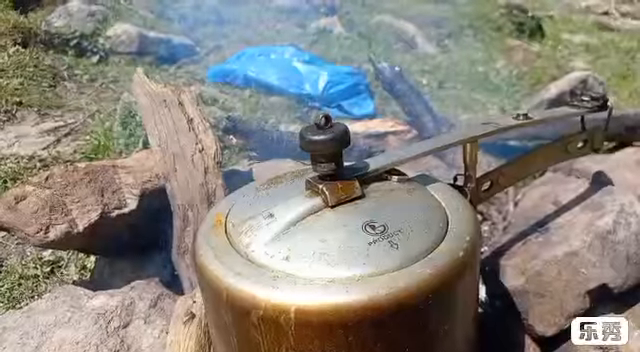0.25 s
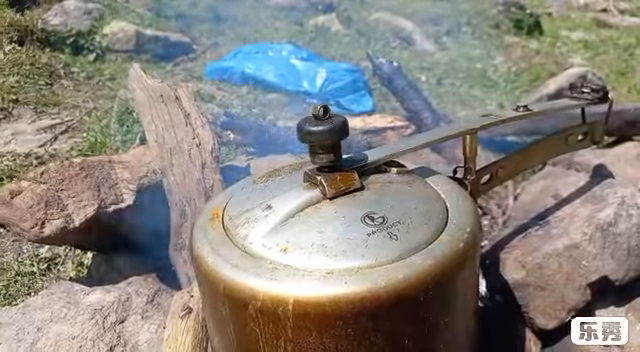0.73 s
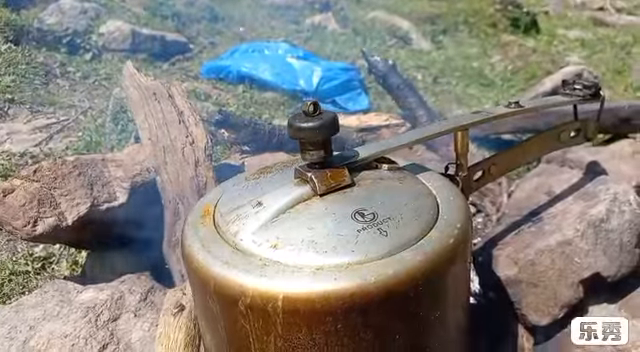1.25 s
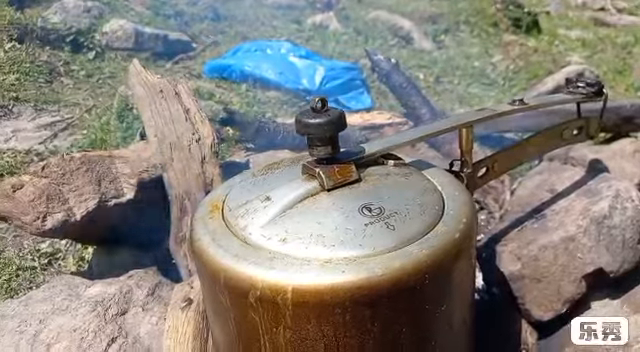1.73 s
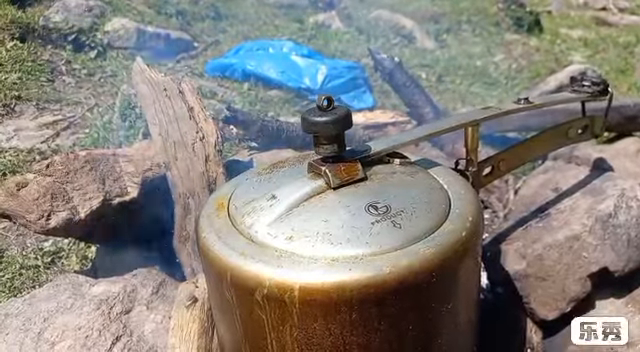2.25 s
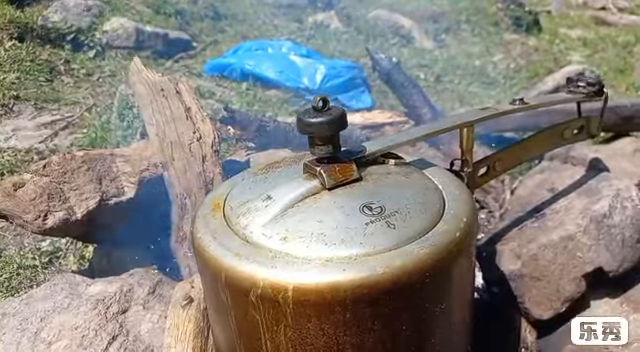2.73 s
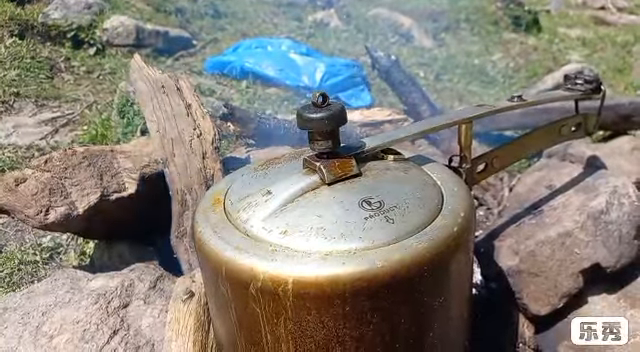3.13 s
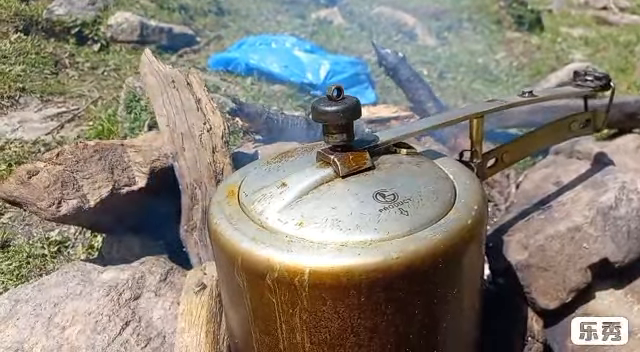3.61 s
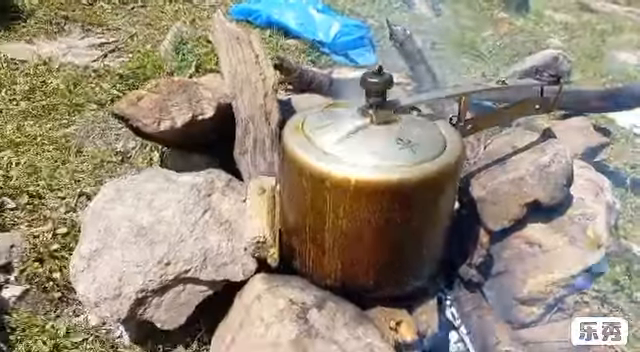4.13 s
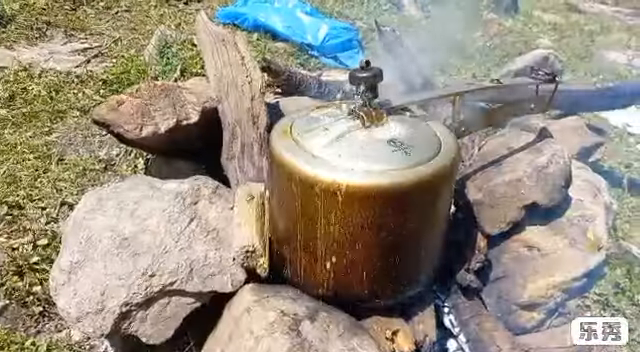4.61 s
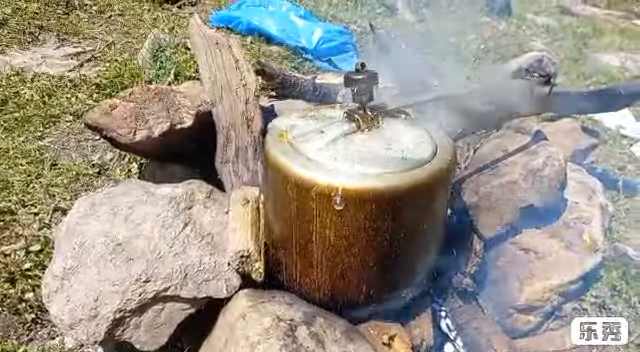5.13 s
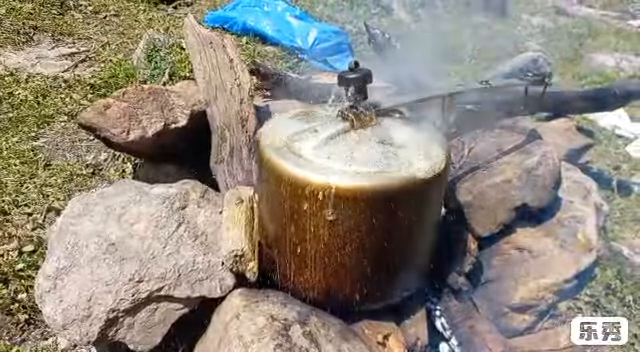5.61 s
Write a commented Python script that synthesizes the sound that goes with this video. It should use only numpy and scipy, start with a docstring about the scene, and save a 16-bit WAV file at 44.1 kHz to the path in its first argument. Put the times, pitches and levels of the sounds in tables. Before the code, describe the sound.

Outdoors, close to a pressure cooker on a wood fire, a thin, slightly grainy steam hiss leaks steadily. Low wind buffets the microphone, mostly on the left, growing heavier past the middle, and a wood snap or two crackles softly. At about four and a half seconds the valve lifts at once and a far louder, broad, fluttering jet of steam roars until the end.

```python
"""Steam hisses thinly, then a full jet roars out, fluttering; wind thumps, mostly on the left, and wood crackles.
A pressure cooker stands on a wood fire outdoors: steam leaks past its valve weight until the weight lifts.
Hiss and jet are patchy noise with narrow peaks, coloured by the lid and the hearth stones.
Wind is lumpy low noise plus short swings on a microphone port; each crackle is a fading burst of noise."""
import sys
import numpy as np
from scipy import signal
from scipy.fft import rfft, irfft, next_fast_len
from scipy.io import wavfile
from scipy.ndimage import uniform_filter1d, map_coordinates

SR = 44100
rng = np.random.default_rng(int(sys.argv[2]) if len(sys.argv) > 2 else 0)


def int16_out(signal):
    """Quantize to a 16-bit WAV file."""
    q = np.round(np.clip(np.atleast_2d(signal).T, -1, 1) * 32767)
    wavfile.write(sys.argv[1], SR, q.astype(np.int16))


N = 258405

# Colour of the finer swirls of wind: (frequency [Hz], relative level per Hz [dB])
SWIRL_COLOUR = [(60, -35), (130, -8), (220, 3), (320, -11.5), (480, -21.5), (700, -40.5), (1400, -96)]


def amp(db):
    """Decibels to gain."""
    return 10 ** (np.asarray(db) / 20)


def unit(x):
    """Scale to rms 1."""
    return x / np.sqrt(np.mean(x ** 2) + 1e-20)


def along(points, hz):
    """Read (frequency [Hz], value) points on a log frequency axis."""
    f, v = np.transpose(points)
    return np.interp(np.log(hz + 1), np.log(f + 1), v)


def curves(rows):
    """One value per sample for each column after the time."""
    s, *cols = np.transpose(rows)
    return [np.interp(np.arange(N) / SR, s, c) for c in cols]


def wobble(rate):
    """A smooth random curve with the given number of random points a second."""
    points = rng.standard_normal(int(N * rate / SR) + 4)
    return map_coordinates(points, [np.arange(N) * rate / SR])


def filtered(x, response):
    """Multiply the spectrum of x by a response that depends on frequency."""
    m = next_fast_len(N + SR // 4)  # spare room at the end
    hz = np.fft.rfftfreq(m, 1 / SR)
    return irfft(rfft(x, m) * response(hz), m)[..., :N]


def lowpass(x, cut_hz, steepness):
    """Keep what lies below cut_hz; a higher steepness cuts off more sharply."""
    return filtered(x, lambda hz: 1 / (1 + (hz / cut_hz) ** steepness))


def noise(spectrum):
    """Coloured noise of rms 1."""
    return unit(filtered(rng.standard_normal(N), lambda hz: amp(along(spectrum, hz))))


def reshaped(x, gain_db, size):
    """Give x a colour that changes in time: gain_db(frequency [Hz], time [s])."""
    hz, s, z = signal.stft(x, SR, nperseg=size)
    return signal.istft(z * amp(gain_db(hz[:, None], s)), SR, nperseg=size)[1][:, :N]


def patches(shape, size_hz, size_s):
    """A random map over frequency and time, blurred into patches of the given sizes in cells."""
    rough = rng.standard_normal(shape)
    return unit(uniform_filter1d(uniform_filter1d(rough, size=size_hz, axis=0), size=size_s, axis=1))


def fire(t60=0.079, tick_db=7, tick_t60=0.0072):
    """Burning wood snaps under the pot: a sharp tick, then a short hollow tail; t60 is the time to fall 60 dB."""
    # When the wood crackles: (time [s], starting level of the tail [dB])
    crackles = [(0.4388, -47.5), (2.246, -52), (4.347, -54)]
    # Colour of a crackle's tail: (frequency [Hz], relative level per Hz [dB])
    ember = [(200, -54), (700, 7.5), (1500, 10), (4000, -11), (15000, -24)]
    t = np.arange(N) / SR

    def snaps(decay):
        return sum((t >= s) * amp(db - 60 * abs(t - s) / decay) for s, db in crackles)
    tails = snaps(t60) * noise(ember)
    ticks = snaps(tick_t60) * amp(tick_db) * rng.standard_normal(N)
    return tails + ticks


def gust_force(rise_db_per_s=750, fall_db_per_s=424, calm_db=-77):
    """Wind force in dB at each port: every gust rises fast, holds and falls back to the calm."""
    # Gusts of wind: (start of hold [s], hold [s], force on the left port [dB], force on the right port [dB])
    gusts = [(0, 0.029, -30, -99), (0.05, 0.042, -49.5, -80), (0.24, 0.059, -36.5, -52),
             (0.335, 0.02, -40, -72), (0.47, 0.059, -58, -80), (0.571, 0.015, -61, -80),
             (0.633, 0.02, -62, -80), (0.703, 0.04, -51.5, -50), (0.81, 0.03, -38, -40),
             (0.856, .13, -32, -81), (1.01, 0.098, -45.5, -78), (1.122, 0.13, -33, -84),
             (1.32, 0.05, -54, -80), (1.416, 0.027, -47, -78), (1.625, 0.097, -31.5, -78),
             (1.746, .18, -37.5, -78), (1.96, 0.14, -53, -78), (2.091, 0.11, -30, -74),
             (2.248, 0.19, -33, -57), (2.43, 0.095, -40, -68), (2.522, 0.21, -29.5, -38.5),
             (2.76, 0.17, -32, -41.5), (2.946, 0.075, -26, -62), (3.044, 0.4, -32.5, -43),
             (3.41, 0.05, -39, -45), (3.49, 0.13, -41.5, -48), (3.648, 0.27, -25.5, -64),
             (3.9, 0.079, -34.5, -43), (4.045, 0.021, -25.5, -38), (4.128, 0.25, -38.5, -71),
             (4.23, 0.018, -31, -76), (4.448, 0.018, -37, -35.5), (4.67, 0.022, -65, -39),
             (4.892, 0.023, -42, -37), (4.99, 0.013, -36, -32.5), (5.07, 0.1, -50, -46)]
    t, force_db = np.arange(N) / SR, np.full((2, N), float(calm_db))
    for start, hold, left_db, right_db in gusts:
        rise_db = rise_db_per_s * (t - start)
        fall_db = fall_db_per_s * (start + hold - t)
        shape_db = np.minimum(0, np.minimum(rise_db, fall_db))
        force_db = np.maximum(force_db, shape_db + np.array([[left_db], [right_db]]))
    return force_db


def port_wind(force_db, lumpy_db=3.5, swirl_lumpy_db=3.0, flurry_db=-13, steepness=1.43, strong_db=-22,
              span_s=0.074):
    """Lumpy rumble on one port follows the gusts; finer swirls grow faster than the rumble."""
    # Colour of the low rumble of wind: (frequency [Hz], relative level per Hz [dB])
    rumble_colour = [(25, -37), (40, -19), (60, -1), (85, 5.5), (115, 2), (160, -8), (200, -12), (240, -22),
                     (330, -40), (500, -53), (1000, -101)]
    lumps = amp(lumpy_db * wobble(45))
    churn = lumps * noise(rumble_colour)
    # Even out the loudness over each short span, then let the gusts set it
    loudness = np.sqrt(abs(uniform_filter1d(churn ** 2, size=int(span_s * SR))))
    rumble = churn / loudness * amp(force_db)
    fine = unit(lumps * amp(swirl_lumpy_db * wobble(60)) * noise(SWIRL_COLOUR))
    swirl_level_db = strong_db + flurry_db + steepness * (force_db - strong_db)
    return rumble + fine * amp(swirl_level_db)


def eddies(snap_hz=232, snap_share=0.33, swirl_db=-6):
    """Each eddy pushes the diaphragm in a brief swing; its tight core adds a shorter snap and a few fine swirls."""
    # Strong eddies on the left port: (time [s], relative thump level [dB], thump frequency [Hz],
    # relative core level [dB], half length [s])
    eddy_rows = [(0.034, -29, 105, -59, 0.0054), (0.245, -29, 90, -53, 0.0074),
                 (0.288, -26, 86, -56, 0.0069), (0.872, -29, 103, -46, 0.01), (0.94, -30, 97, -48, 0.0099),
                 (1.147, -43, 120, -39, 0.01), (1.23, -27, 91, -52, 0.0075), (1.257, -25, 111, -44, 0.0034),
                 (1.662, -27, 94, -46, 0.007), (1.897, -46, 121, -42, 0.0067),
                 (2.191, -25, 122, -35, 0.0041), (2.426, -23.5, 116, -38, 0.0073),
                 (2.545, -30, 118, -33, 0.0095), (2.694, -25.5, 109, -37, 0.016),
                 (2.76, -15, 123, -16, 0.0039), (2.778, -14, 110, -24, 0.0087),
                 (2.789, -29, 114, -16.5, 0.014), (2.802, -15, 103, -22, 0.0085),
                 (2.841, -19, 108, -32, 0.0096), (2.891, -38, 130.4, -24, 0.0045),
                 (2.931, -20.5, 96, -41, 0.0074), (2.994, -19.5, 82.4, -28.5, 0.015),
                 (3.039, -23.5, 124, -20, 0.0076), (3.065, -25, 95, -40, 0.0083),
                 (3.145, -23.5, 131, -23, 0.0082), (3.176, -22.5, 89, -25.5, 0.013),
                 (3.199, -21.5, 86.6, -35, 0.013), (3.261, -38, 100, -52, 0.0075),
                 (3.284, -31, 120, -26, 0.009), (3.32, -25.5, 126, -30, 0.014),
                 (3.371, -24.5, 132, -31.5, 0.0054), (3.669, -27, 113, -16.5, 0.0091),
                 (3.687, -30, 121, -26, 0.0025), (3.717, -23, 101, -47, 0.0056),
                 (3.754, -18, 103, -10.5, 0.0031), (3.819, -20, 115, -26, 0.0024),
                 (3.854, -24, 120, -25, 0.0037), (3.869, -37, 105, -21.5, 0.0086),
                 (3.904, -23, 120, -30, 0.011), (3.945, -25.5, 112, -34, 0.0082),
                 (4.057, -21, 115, -25.5, 0.011), (4.156, -23.5, 95.5, -59, 0.0062),
                 (4.302, -17, 95, -39, 0.0049), (4.999, -24.5, 84, -40, 0.0047)]
    t, out = np.arange(N) / SR, np.zeros(N)
    swirl = noise(SWIRL_COLOUR)
    phases = rng.uniform(0, 2 * np.pi, len(eddy_rows))
    for (s, thump_db, thump_hz, core_db, half), phase in zip(eddy_rows, phases):
        near = abs(t - s) < 4 * half
        u = t[near] - s  # seconds from the middle of the eddy

        def swing(hz, width):
            return np.sqrt(2) * np.exp(-(u / width) ** 2 / 2) * np.cos(2 * np.pi * hz * u + phase)
        fine = amp(swirl_db) * np.exp(-(u / half) ** 2) * unit(swirl[near])
        core = swing(snap_hz, snap_share * half) + fine
        out[near] += amp(thump_db) * swing(thump_hz, half) + amp(core_db) * core
    return out


def wind(eddy_db=-1.0, skew=0.32):
    """Gusts and eddies strike the left port, the right is mostly sheltered; hard blows suck more than they push."""
    left_db, right_db = gust_force()
    left = port_wind(left_db) + amp(eddy_db) * eddies()
    push = np.array([left, port_wind(right_db)])
    return push - skew * push ** 2


def turbulence(patchy_db, size=512):
    """Turbulent steam: two white noises that share short-lived patches of random gain."""
    z = signal.stft(rng.standard_normal((2, N)), nperseg=size)[2]
    field = patches(z.shape[1:], size_hz=9, size_s=10)
    return signal.istft(z * amp(patchy_db * field), nperseg=size)[1][:, :N]


def at_ports(pair, colour, balance, alike, lead, low_cut_hz, peaks, peak_width_hz):
    """Steam at the two ports: coloured, with narrow peaks, partly alike, mostly earlier on the left."""
    ear = np.array([[1], [-1]])  # left, right

    def blend(hz):
        turn = np.arccos(np.clip(along(alike, hz), 0, 1)) / 2
        return np.array([np.cos(turn), np.sin(turn)])
    mid, side = filtered(pair, blend)

    def path(hz):
        peaks_db = sum(db / (1 + ((hz - centre) / peak_width_hz) ** 4) for centre, db in peaks)
        angle = np.interp(hz, *np.transpose(lead))
        no_bass = np.sqrt(1 - 1 / (1 + (hz / low_cut_hz) ** 6))
        level_db = along(colour, hz) + peaks_db + ear * along(balance, hz) / 2
        return no_bass * amp(level_db) * np.exp(1j * ear * angle / 2)
    return unit(filtered(mid + ear * side, path))


def reflections(steam, ripple, slide_per_s, middle_s):
    """Peaks and notches from lid and stones; they slide in pitch as the hand-held microphone drifts."""
    def comb_db(hz, s):
        bumps = sum(np.outer([left, right], np.exp(-((hz - centre) / width) ** 2))
                    for centre, width, left, right in ripple)
        unslid_hz = hz / (1 + slide_per_s * (s - middle_s))
        return np.array([np.interp(unslid_hz, hz.ravel(), port) for port in bumps])
    return unit(reshaped(steam, comb_db, size=4096))


def spits(rate, decay_s):
    """Droplets torn through the gap at random, rate a second: sharp jumps that die away; mean 0, rms 1."""
    kicks = (rng.random(N) < rate / SR) * rng.uniform(0.41, 1, N)
    jumps = signal.lfilter([1], [1, -np.exp(-1 / (decay_s * SR))], kicks)
    return unit(jumps - jumps.mean())


def low_part_db(hz, s, patchy_db=6.0):
    """The level of the low part of the hiss varies slowly and in random patches."""
    # Slow change of the low part: (time [s], gain [dB])
    slow_gain = [(0, -2), (.6, -4), (1, 3.5), (1.4, -3.5), (1.75, 5), (2.3, -3.5), (3.1, 3), (3.53, -12),
                 (3.75, 1.5), (4.45, 1.5)]
    field = np.minimum(patches((len(hz), len(s)), size_hz=6, size_s=6), 1)  # limit the boosts
    return np.interp(s, *np.transpose(slow_gain)) + patchy_db * field


def leak(gain_db=3, air_db=3, split_hz=8800, spit_db=0.5, flow_db=4.5, low_cut_hz=350, edge_hz=950):
    """A thin hiss: one flow drives body and airy top; the part below edge_hz has varying level."""
    # Steam leaking past the seated weight: (time [s], relative flow level [dB])
    leak_flow = [(0, -43.5), (.35, -43), (.75, -41.5), (1.6, -41.5), (2.7, -42), (3.3, -43), (4.45, -43)]
    # Colour of the hiss: (frequency [Hz], relative level per Hz [dB])
    colour = [(380, -47), (520, -33), (700, -28), (1100, -34), (1400, -3.5), (2200, -9.5), (4000, -7.5),
              (5300, -2.5), (7600, -2.5), (8600, -8.5), (11300, -3.5), (12400, 1), (14000, -10.5),
              (15600, -15.5)]
    # Loudness between the ports: (frequency [Hz], left minus right [dB])
    balance = [(450, -6), (700, -22), (1100, -43), (1400, -0.5), (3000, 2.5), (6000, 4.5), (9500, 6),
               (15000, 6.5)]
    # Likeness of the two ports: (frequency [Hz], likeness [0-1])
    alike = [(800, 0.5), (1400, 0.82), (2300, 0.47), (2950, 0.77), (3300, 0.57), (5000, 0.72), (6200, 0.67),
             (7500, 0), (9000, 0.3), (9700, 0), (10400, 0.56), (11400, 0.48), (12300, 0.4), (13000, 0.4)]
    # The left port is nearer the valve: (frequency [Hz], lead of the left [rad])
    lead = [(0, 0), (600, 1.2), (1500, 1.7), (2100, 3.4), (2500, 4.4), (3100, 4.0), (4200, 8.0),
            (5200, 10.6), (6200, 11.9), (7500, 14.2), (9000, 16.7), (11000, 22.0), (12300, 24.5),
            (15700, 30.1)]
    # Narrow peaks that give the hiss a faint tonal grain: (frequency [Hz], boost [dB])
    peaks = [(5930, 5.5), (7380, 0.5), (12250, 1)]
    # Reflections off lid and stones: (frequency [Hz], width [Hz], left gain [dB], right gain [dB])
    ripple = [(1113, 202, 15.5, -2.5), (1425, 128, -4, -7.5), (1630, 180, -0.5, 3), (2610, 42, -3, 9.5),
              (2760, 180, 4, -2.5), (3410, 150, 1.4, 3.5), (4820, 77, 3, 5), (5150, 140, -0.5, 6.5),
              (5720, 327, 1.1, -3.5), (6020, 42, -3.5, 14), (6660, 590, -5, 0.8), (7320, 430, 3.5, 1.5),
              (8930, 160, 1.5, 5.5), (10200, 110, 2, -3)]
    level_db, = curves(leak_flow)
    steam = at_ports(turbulence(patchy_db=0.93), colour, balance, alike, lead, low_cut_hz, peaks,
                     peak_width_hz=31)
    steam = reflections(steam, ripple, slide_per_s=0.0017, middle_s=2.8)
    body = lowpass(steam, split_hz, 8)
    air = steam - body
    low_part = lowpass(steam, edge_hz, 8)
    varied_body = body - low_part + reshaped(low_part, low_part_db, size=1024)
    flow = varied_body * amp(gain_db) + air * amp(air_db)
    return flow * amp(level_db + flow_db + spit_db * spits(rate=70, decay_s=0.0091))


def band_changes_db(hz, s):
    """Short gain changes in bands of the jet: boosts, and narrow cuts near 2 kHz."""
    # The first boost comes as the weight pops up:
    # (time [s], half length [s], centre [Hz], half width [octaves], gain [dB])
    changes = [(4.484, 0.006, 700, 1, 5), (4.56, .07, 2400, .08, -8), (4.582, 0.12, 6380, 0.13, 4),
               (4.977, 0.026, 700, 0.5, 8.5), (5.1, 0.2, 2500, 0.29, -3.5), (5.54, .07, 1930, 0.08, -3),
               (5.695, 0.19, 2480, 0.15, 2), (5.818, .06, 7550, .07, 8)]

    def change(at, half, centre, octaves, db):
        pitch_distance = np.log2((hz + 1) / centre) / octaves
        return db * np.exp(-((s - at) / half) ** 2 - pitch_distance ** 2)
    return sum(change(*row) for row in changes)


def jet(base_db=-27.5, rush_db=2.0, roar_db=1.14, spray_db=1.5, spit_db=0.25, low_hz=1250, high_hz=7500,
        low_cut_hz=85):
    """The open jet: big eddies roar, the core rushes, droplets fizz and make it all flutter as it surges."""
    # The jet swells and eases: (time [s], roar gain [dB], rush gain [dB], spray gain [dB])
    surges = [(4.48, 0.6, 0.1, .6), (4.9, 0.9, 1.26, 0), (5.1, 2, .5, .1), (5.21, 3, 0, 0),
              (5.33, -1, 0.5, -1.5), (5.55, 0, 0.3, -.8), (5.86, -0.2, 0.4, -0.1)]
    # Colour of the jet: (frequency [Hz], relative level per Hz [dB])
    colour = [(75, -11.5), (150, -10), (330, -8), (650, -3), (1100, -1), (2300, -3), (3500, 0),
              (4800, -0.9), (6000, -6.5), (8300, -13), (10800, -6), (12800, -5), (15600, -14)]
    # Loudness between the ports: (frequency [Hz], left minus right [dB])
    balance = [(600, 0.78), (1500, -1.3), (3000, -2.5), (6000, -0.47), (9500, 2.1), (15000, 0.09)]
    # Likeness of the two ports: (frequency [Hz], likeness [0-1])
    alike = [(150, 0.3), (600, 0.84), (1800, 0.78), (2300, 0.85), (2650, 0.88), (2950, 0.2), (3350, 0.98),
             (4800, 0.91), (5300, .4), (6500, 0.34), (11000, 0.22), (12500, 0.59), (15000, 0.29)]
    # The left port is nearer the valve: (frequency [Hz], lead of the left [rad])
    lead = [(0, 0), (150, -0.4), (1100, 1.2), (2200, 3.1), (2800, 4.6), (3500, 5.1), (4200, 7.0),
            (5000, 10.1), (6000, 10.5), (7000, 11.4), (8200, 11.9), (10000, 15.6), (12500, 20.3),
            (15600, 23.1)]
    # Narrow peaks that give the jet a faint tonal grain: (frequency [Hz], boost [dB])
    peaks = [(762, 1.6), (1038, 1.7), (1607, 2.3), (2645, 5.7), (2839, 5.8), (3255, 2.9), (3527, 3.2),
             (3712, 2.8), (3805, 2.3), (4107, 2), (4503, 3.5), (5303, 8.7), (5583, 4), (5815, 3.5),
             (6211, 3.9), (7337, 3.5), (11134, 4)]
    # Reflections off lid and stones: (frequency [Hz], width [Hz], left gain [dB], right gain [dB])
    ripple = [(444, 23, 1.5, 3.5), (530, 36, -2, -1.7), (870, 69, -5, -4.5), (1110, 42, 3, 0.5),
              (1280, 38, 3, -1), (1270, 76, -9, -2), (1350, 80, -5, -0.5), (1513, 41, 4, -11),
              (1656, 80, 3, 3.5), (2160, 70, 1.5, 4.5), (2320, 96, 4, -5), (2520, 40, -6, -2),
              (3080, 130, -4.5, -6), (3130, 24, -1, -6), (3210, 81, -3, 9.5), (3320, 270, 3, -5),
              (3970, 110, -1.5, -3.5), (4100, 70, 2.5, 6), (4290, 240, -2.5, -5), (4770, 250, 6, 5),
              (4940, 53, -2.5, -8), (5510, 30, 10.5, 5), (5850, 54, 8.5, 7), (6090, 37, 6, 9),
              (6260, 81, -4, 2.5), (6620, 52, 7.5, 0.8), (6700, 84, -3.5, -6), (6830, 230, 6.5, 6.5),
              (7260, 50, 3.4, 3.3), (8000, 107, 4, 9.5), (8292, 30, -2, -8), (8600, 117, 0, -1),
              (8800, 170, 5.5, 8), (9380, 120, 9, 6), (9788, 85, 5, -3.4), (10300, 74, 3, 6.5),
              (11000, 67, 1, 7), (12200, 81, 1, -2.5), (13000, 77, 4, 6), (13097, 65, 2.9, 4),
              (14016, 63, 5, -3.6), (15085, 138, 3.9, 3.8)]
    roar_surge_db, rush_surge_db, spray_surge_db = curves(surges)
    steam = at_ports(turbulence(patchy_db=1.16), colour, balance, alike, lead, low_cut_hz, peaks,
                     peak_width_hz=20)
    steam = reflections(steam, ripple, slide_per_s=-0.0046, middle_s=5.5)
    steam = reshaped(steam, band_changes_db, size=512)
    roar = lowpass(steam, low_hz, 6)
    spray = steam - lowpass(steam, high_hz, 8)
    rush = steam - roar - spray
    flow = rush * amp(rush_db + rush_surge_db)
    flow = flow + roar * amp(roar_db + roar_surge_db)
    flow = flow + spray * amp(spray_db + spray_surge_db)
    return flow * amp(base_db + spit_db * spits(rate=150, decay_s=0.011))


def valve_opening(lift_s=4.481, lift_time_s=0.0012):
    """0 while the weight sits on the vent, 1 once it has lifted; lift_s is the middle of the lift."""
    return np.clip((np.arange(N) / SR - lift_s) / lift_time_s + .5, 0, 1)


def scene():
    """The leak gives way to the jet; wind and fire go on independently of the valve."""
    opening = valve_opening()
    steam = (1 - opening) * leak() + opening * jet()
    return fire() + wind() + steam


def record(dry, low_cut_hz=48, top_hz=15800):
    """The recorder cuts the deepest rumble and keeps nothing above its band limit."""
    return filtered(dry, lambda hz: (hz < top_hz) * np.sqrt(1 - 1 / (1 + (hz / low_cut_hz) ** 8)))


dry = scene()
out = record(dry)
int16_out(out)
```